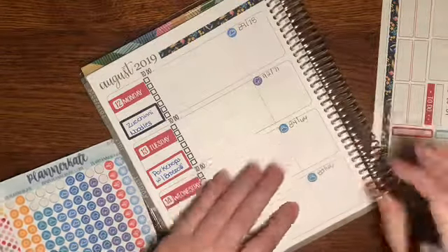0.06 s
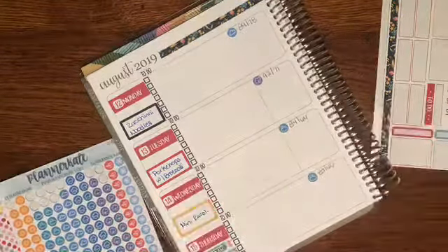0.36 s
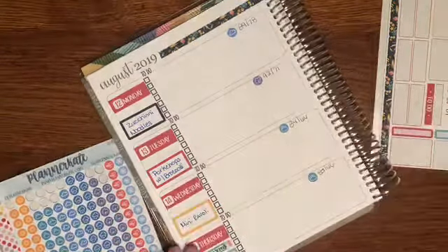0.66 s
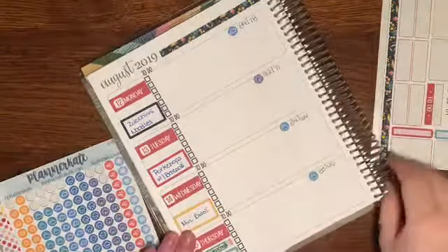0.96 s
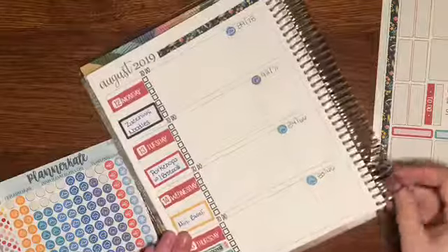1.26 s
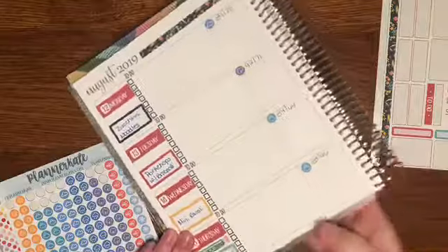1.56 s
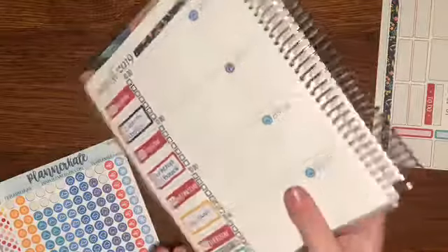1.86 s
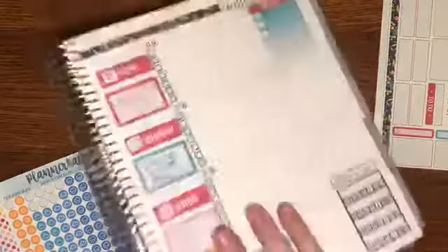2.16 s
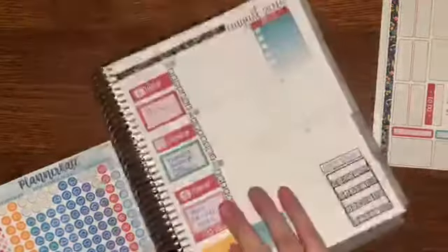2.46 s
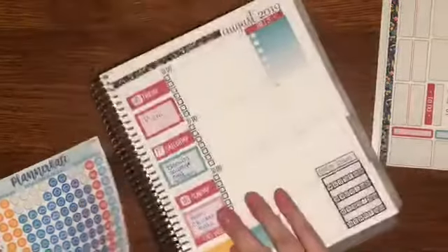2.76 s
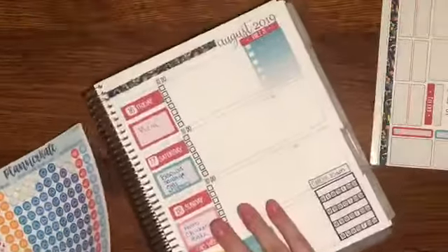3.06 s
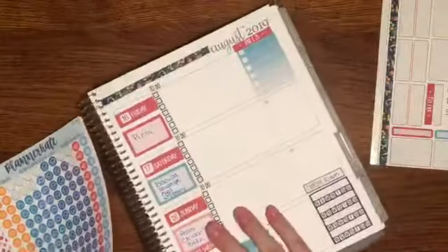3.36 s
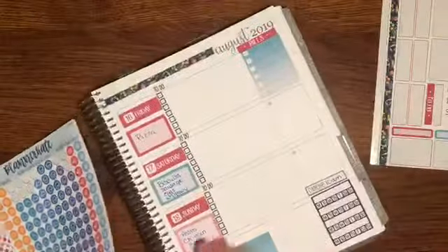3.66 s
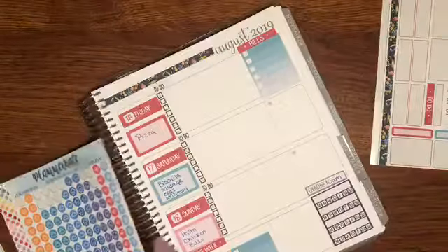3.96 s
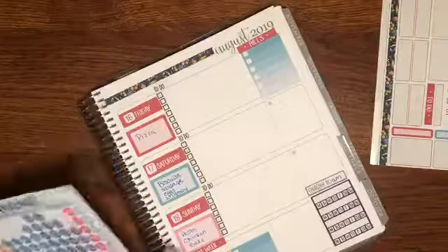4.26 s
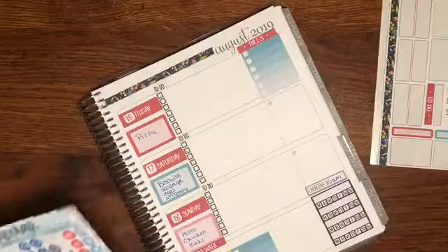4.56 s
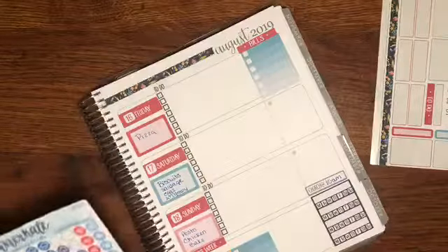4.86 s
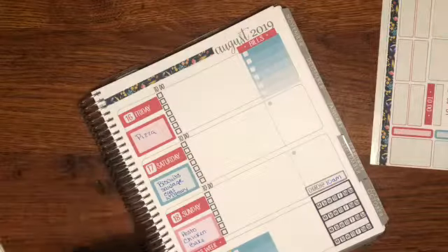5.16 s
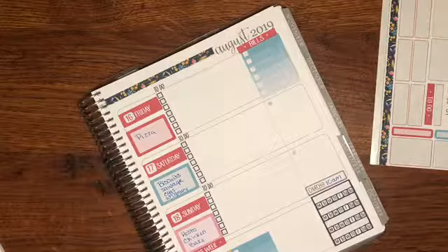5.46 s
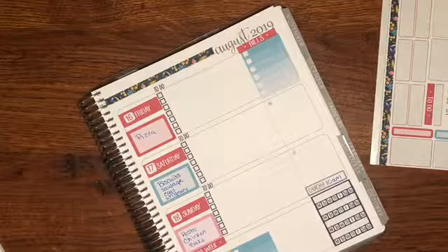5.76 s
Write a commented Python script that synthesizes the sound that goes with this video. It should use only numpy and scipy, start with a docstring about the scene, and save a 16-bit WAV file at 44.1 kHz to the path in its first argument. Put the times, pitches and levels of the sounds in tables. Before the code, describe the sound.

A pen clatters onto a wooden table, then a spiral-bound planner is flipped over with a slap, amid soft paper rustles.

```python
"""A spiral-bound planner on a wooden table, close to the microphone in a small quiet room.
At 0.4 s a pen is put down: it clatters, knocks the wood and its barrel rings. From 1.4 s the planner
is lifted and turned over; at 2.3 s it drops with a slap and a boom of the table, then slides into
place, paper fibres catching and slipping. From 3.3 s a sticker sheet is dragged aside, snaps at its
edge and is laid down at 5.4 s."""
import sys
import numpy as np
from scipy import signal
from scipy.fft import rfft, irfft
from scipy.io import wavfile
from scipy.ndimage import uniform_filter1d

SR = 44100
rng = np.random.default_rng(int(sys.argv[2]) if len(sys.argv) > 2 else 0)


def wav_record(signal):
    """Record a signal, one row per channel, as 16-bit PCM in the file named by sys.argv[1]."""
    frames = np.transpose(np.atleast_2d(signal))
    bounded = np.clip(frames, -1, 1)
    # unit amplitude maps onto the largest positive 16-bit level
    quanta = np.round(bounded * 32767).astype(np.int16)
    wavfile.write(sys.argv[1], SR, quanta)


N = 255339

# Knock resonances of the table top. Each row: frequency in Hz, width in Hz, relative level in dB.
WOOD_RESONANCES = [(273, 52, -1), (416, 34, -1.5), (668, 40, -4.5), (1094, 65, -13)]


def amp(db):
    """Decibels to gain."""
    return 10 ** (np.asarray(db) / 20)


def unit_rms(x):
    """Scales to rms 1."""
    return x / np.sqrt(np.mean(x ** 2) + 1e-20)


def unit_blow(x):
    """Scales to the energy of 10 ms at rms 1."""
    return x / np.sqrt(np.sum(x ** 2) / (SR / 100) + 1e-20)


def curve(points, hz):
    """Interpolates (Hz, value) points on a log-frequency axis."""
    point_hz, values = np.transpose(points)
    return np.interp(np.log(hz + 1), np.log(point_hz), values)


def add(mix, start_s, sound):
    """Mixes a sound in at start_s."""
    part = mix[max(round(start_s * SR), 0):][:len(sound)]
    part += sound[:len(part)]


def fade(t, t60_s):
    """Exponential decay, 60 dB in t60_s."""
    return 1000 ** (-t / max(t60_s, 1e-3))


def ring(modes, t):
    """Sum of decaying sine modes."""
    return sum(amp(db) * fade(t, t60_s) * np.sin(2 * np.pi * hz * t) for hz, db, t60_s in modes)


def coloured(x, db_at, size=4096):
    """Minimum-phase filter with gain db_at(Hz)."""
    log_gain = np.log(amp(db_at(abs(np.fft.fftfreq(size, 1 / SR)))))
    response = np.fft.ifft(np.exp(np.conj(signal.hilbert(log_gain)))).real
    return signal.oaconvolve(x, response[:size // 2])[:len(x)]


def whitened(x, size=4096):
    """Flattens the broad humps of a burst's spectrum."""
    power = uniform_filter1d(abs(np.fft.fft(x, size)) ** 2, size=45, mode="wrap")
    return coloured(x, lambda hz: -10 * np.log10(power / power.mean() + 1e-6), size=size)


def peaks_db(resonances, hz):
    """Boost that resonances add to a spectrum."""
    return sum(db / (1 + (2 * (hz - centre_hz) / width_hz) ** 2) for centre_hz, width_hz, db in resonances)


def tone_db(colour, hz, body_db, fizz_db):
    """Contact spectrum: broad contact adds body (mids), dry sharp contact adds fizz (treble)."""
    body_weight = curve([(300, 0.21), (900, 0.91), (2300, 0.63), (3300, 0.097)], hz)
    fizz_weight = curve([(4800, 0), (8000, 0.41), (12500, 0.92)], hz)
    return curve(colour, hz) + body_db * body_weight + fizz_db * fizz_weight


def background(rms_db=-65):
    """Steady low room rumble with a faint hiss."""
    # Each row: frequency in Hz, relative noise density in dB.
    spectrum = [(22, -45.5), (40, -23.5), (53, -13), (64, 2.5), (76, -7), (95, -14.5), (135, -4.5),
                (200, -13.5), (350, -15), (600, -17.5), (1100, -21.5), (2300, -32.5), (3400, -34.5),
                (4250, -27.5), (4900, -36.5), (6500, -36), (16000, -44)]
    gain = amp(curve(spectrum, np.fft.rfftfreq(N, 1 / SR)))
    return amp(rms_db) * unit_rms(irfft(rfft(rng.standard_normal(N)) * gain, N))


def room(x, early_db=-9, early_t60_s=0.062, tail_db=-18, echoes_per_s=3000):
    """Adds quick reflections off the table and nearby things, then a short, duller tail."""
    # Each row: frequency in Hz, reverberation t60 in seconds.
    decay_times = [(100, 0.53), (400, 0.33), (1500, 0.31), (4000, 0.36), (6000, 0.21), (15000, 0.29)]
    # Soft furnishings absorb treble. Each row: frequency in Hz, gain in dB.
    tail_colour = [(150, 1), (1200, 2), (2500, -0.5), (4000, -3), (5200, -2), (7000, 2), (14000, -6.5)]
    t = np.arange(SR * 2 // 3) / SR
    taps = rng.choice([-1., 1.], (2, len(t))) * (rng.random((2, len(t))) < echoes_per_s / SR)
    early = taps[0] * (t > 0.004) * fade(t, early_t60_s)
    hz, frame_s, spectra = signal.stft(taps[1] * (t > 0.009), SR, nperseg=256)
    decay = 1000 ** (-frame_s / curve(decay_times, hz)[:, None])
    tail = signal.istft(spectra * decay, SR, nperseg=256)[1][:len(t)]
    tail = coloured(tail / np.linalg.norm(tail), lambda f: curve(tail_colour, f))
    response = amp(early_db) * early / np.linalg.norm(early) + amp(tail_db) * tail
    return x + signal.fftconvolve(x, response)[:N]


def wood(force):
    """Passes a force through the resonances of the table top."""
    return sum(amp(db) * signal.lfilter(*signal.iirpeak(hz, hz / width_hz, SR), force)
               for hz, width_hz, db in WOOD_RESONANCES)


def knock(db, t60_s):
    """Struck table top: its modes, detuned per hit, plus a short rattle through the wood."""
    t = np.arange(SR // 4) / SR
    modes = sum(amp(mode_db) * np.exp(-np.pi * width_hz * t)
                * np.sin(2 * np.pi * hz * rng.uniform(0.88, 1.04) * t)
                for hz, width_hz, mode_db in WOOD_RESONANCES)
    attack = 1 - np.exp(-t / 0.001)
    rattle = wood(rng.standard_normal(len(t)) * fade(t, t60_s))
    return amp(db) * unit_blow(unit_blow(modes * attack) + 0.74 * unit_blow(rattle))


def contact(colour, t60_s, body_db, fizz_db, spot_hz, rise_s, q, peak_db):
    """A brief burst of micro-collisions, filtered by the spot struck."""
    t = np.arange(SR // 4) / SR
    chatter = rng.choice([-1., 1.], len(t)) * fade(t, t60_s) * (1 - np.exp(-t / rise_s))
    spot = [(hz, hz / q, peak_db) for hz in spot_hz]
    burst = coloured(whitened(chatter),
                     lambda hz: tone_db(colour, hz, body_db, fizz_db) + peaks_db(spot, hz))
    return unit_blow(burst)


def clack(spot_hz, t60_s):
    """Short pitched notes of a hard edge, the higher ones stronger."""
    t = np.arange(SR // 10) / SR
    notes = sum(np.sqrt(hz) * np.sin(2 * np.pi * hz * t) for hz in spot_hz)
    return unit_blow(notes * fade(t, t60_s) * (1 - np.exp(-t / 0.0033)))


def rub_gain(hz, body_db, fizz_db, swish_hz, swish_q=3.5, swish_db=4):
    """Spectrum of one rub, rms 1: fixed page resonances under a broad swish."""
    # Each row: frequency in Hz, relative level in dB.
    colour = [(150, -2.5), (400, -11.5), (700, -17), (1150, -13), (1700, -14), (2300, -7.5), (3200, -5),
              (4100, 2.5), (5000, -5.5), (6300, -17), (8500, -31.5), (14200, -39.5)]
    # Page stack and cover. Each row: frequency in Hz, width in Hz, boost in dB.
    page_resonances = [(1109, 49, 9), (1753, 310, 6.5), (2920, 97, 0), (3575, 220, 2), (3860, 140, -2)]
    resonances = list(page_resonances) + [(swish_hz, swish_hz / swish_q, swish_db)]
    return unit_rms(amp(tone_db(colour, hz, body_db, fizz_db) + peaks_db(resonances, hz)))


def hand_speed(t, start_s, rise_s, hold_s, release_s):
    """Speed of a stroke, 0 to 1: ramps up, holds, ramps down."""
    rising = (t - start_s) / max(rise_s, 1e-3)
    falling = (start_s + rise_s + hold_s + release_s - t) / max(release_s, 1e-3)
    return np.clip(np.minimum(rising, falling), 0, 1) ** 0.94


def paper_slides(snaps_per_s=1200, snap_share=0.24, idle_db=-74, patchy_db=1.5, flicker_db=1.6):
    """Paper fibres catch and slip: hiss and tiny snaps follow the hand's speed; the wood rumbles."""
    # Paper under the hands or on the wood. Each row: start, rise, hold and release in seconds,
    # level, body and fizz in dB, swish pitch in Hz.
    strokes = [(0.0, 0.0033, 0.037, 0.14, -52, 7, 14, 4200), (0.16, 0.025, 0.091, 0.2, -65, -7, 18, 4140),
               (0.91, 0.057, 0.017, .11, -59.5, 18, 6, 4010),
               (1.36, 0.21, 0.034, 0.15, -54, 4.5, 22.5, 3900),
               (1.436, 0.037, 0.013, 0.013, -47, -3, 2, 3950), (1.62, 0.083, .56, .1, -63.5, 11.5, 7, 4130),
               (1.829, 0.071, 0.055, 0.12, -47.5, -8.5, 3, 5620),
               (2.35, 0.18, 0.11, 0.081, -58, 12, 0, 4270), (2.63, 0.21, 0.01, 0.039, -45.5, 2, -8, 3740),
               (2.86, 0.1, 0.26, 0.22, -51, 9, -2, 3540), (3.31, 0.053, .11, .05, -53.5, 19.5, 17, 3800),
               (3.42, 0.053, 0.0055, 0.021, -46.5, 17, 2, 3800), (3.49, .03, 0.1, 0.049, -60, 14, 12, 4100),
               (3.578, 0.15, 0.0055, 0.058, -47.5, 4, -14, 3600),
               (3.73, 0.3, 0.027, 0.064, -49.5, -6.5, 4, 4150),
               (4.05, 0.018, 0.17, 0.088, -55, 9.5, 3, 4400), (4.39, 0.064, .14, 0.053, -69.5, -3, 8, 4180),
               (4.895, 0.047, 0.14, .05, -61, -1.5, 18.5, 4110),
               (5.03, 0.03, .005, 0.037, -63, -2.5, 28, 4050),
               (5.07, 0.045, .02, 0.17, -62.5, -5.5, 3, 4400), (5.25, 0.12, .05, 0.15, -63, 6, 13, 4150)]
    snaps = (rng.random(N) < snaps_per_s / SR) * rng.choice([-1, 1], N)
    snaps = snaps * amp(3 * np.minimum(rng.exponential(1, N), 4))
    friction = np.sqrt(snap_share) * unit_rms(snaps) + np.sqrt(1 - snap_share) * rng.standard_normal(N)
    hz, frame_s, spectra = signal.stft(friction, SR, nperseg=512, noverlap=384)
    idle_rustle = amp(idle_db) * rub_gain(hz, body_db=6.5, fizz_db=10.5, swish_hz=4136)
    hiss_power, drag_power = idle_rustle[:, None] ** 2, 0
    for *timing_s, db, body_db, fizz_db, swish_hz in strokes:
        level = amp(db) * hand_speed(frame_s, *timing_s)
        hiss_power = hiss_power + np.outer(rub_gain(hz, body_db, fizz_db, swish_hz), level) ** 2
        drag_power = drag_power + (level * amp(-16 + 0.15 * body_db)) ** 2
    # The colour shifts as different spots of the paper touch.
    patches = uniform_filter1d(rng.standard_normal(spectra.shape), size=5, axis=0)
    patches = unit_rms(uniform_filter1d(patches, size=16, axis=1))
    spectra = spectra * amp(patchy_db * patches) * np.sqrt(hiss_power)
    hiss = signal.istft(spectra, SR, nperseg=512, noverlap=384)[1][:N]
    hand_jitter = unit_rms(uniform_filter1d(rng.standard_normal(N), size=700))
    drag_level = np.interp(np.arange(N) / SR, frame_s, np.sqrt(drag_power))
    drag = unit_rms(wood(rng.standard_normal(N))) * drag_level
    return amp(flicker_db * hand_jitter) * (hiss + drag)


def page_bumps(width_hz=90, puff_db=-7, puff_band_hz=(180, 850)):
    """Fingers and palm push on the page stack: a dull puff around one hollow resonance."""
    # Each row: start in seconds, level in dB, t60 in seconds, stack pitch in Hz.
    bumps = [(.545, -49, 0.029, 702), (0.552, -41, .041, 285), (0.892, -53, .14, 340),
             (.917, -42, 0.21, 370), (.958, -40.5, 0.11, 388), (1.049, -44.5, .12, 297.6),
             (1.163, -49.5, 0.053, 412), (1.695, -52, 0.053, 416), (1.963, -55, .06, 419),
             (2.009, -57.5, 0.11, 424), (2.303, -33, 0.045, 347), (2.322, -26, 0.042, 480),
             (2.946, -48.5, 0.086, 308), (3.048, -53, 0.027, 373), (3.327, -49, 0.15, 280),
             (3.404, -51, 0.1, 362), (3.438, -48.5, .17, 300), (3.482, -39, 0.049, 272),
             (4.108, -49, 0.025, 650), (5.665, -59.5, .035, 450)]
    out, t = np.zeros(N), np.arange(SR // 4) / SR
    for start_s, db, t60_s, hz in bumps:
        force = rng.standard_normal(len(t)) * fade(t, t60_s) * (1 - np.exp(-t / 0.003))
        puff = signal.lfilter(*signal.butter(2, puff_band_hz, "band", fs=SR), force)
        hollow = signal.lfilter(*signal.iirpeak(hz, hz / width_hz, SR), puff)
        add(out, start_s, amp(db) * (unit_blow(hollow) + amp(puff_db) * unit_blow(puff)))
    return out


def finger_ticks():
    """Nails, fingers and page edges tick; a touch with more body rings lower and knocks harder."""
    # Each row: start in seconds, level in dB, t60 in seconds, body and fizz in dB.
    touches = [(0.111, -54, 0.036, -10, 0), (0.13, -46, 0.04, -3, 11), (0.296, -51, 0.021, -13, 2),
               (0.3251, -54, 0.02, -2.5, -13.5), (0.39, -56, .043, 9.5, -11.5),
               (0.9145, -33, 0.073, 8.5, 10), (0.964, -46, .05, 13.5, 6), (1.031, -47, .053, 12, -29),
               (1.0465, -50.5, .05, 8, -17), (1.1621, -52, 0.027, 15, -25), (1.4141, -48.5, 0.026, 15, 5),
               (1.461, -47, .08, -14, -10), (1.6858, -51, 0.011, 27, -9), (1.7777, -53.5, 0.0061, 9, 7),
               (2.005, -43, 0.039, -2, 1), (2.273, -47.5, .05, 9, -6), (2.281, -43, .038, 8, -10),
               (3.7594, -39, 0.0099, 0.5, 0), (3.8803, -48, 0.017, 3, -11), (3.899, -45.5, 0.021, 7.5, 1),
               (4.3728, -61.5, 0.02, 15, -8), (4.417, -59, 0.026, 11.5, -8), (4.576, -57, .017, 1.5, 1),
               (4.601, -62, .071, 19, -7), (5.3945, -48, 0.026, 17.5, 6.5), (5.471, -47, 0.019, 11.5, -2)]
    # Each row: frequency in Hz, relative level in dB.
    colour = [(150, -9), (400, -0.5), (700, -11), (1150, -7.5), (1700, -9.5), (2300, -6.5), (3200, -1.5),
              (4100, 6), (5000, -1.5), (6300, -13.5), (8500, -20.5), (14200, -31.5)]
    # Each row: body in dB, pitch in Hz.
    pitch_by_body = [(-6.5, 3800), (7.5, 3800), (17, 1200), (23, 967)]
    out = np.zeros(N)
    for start_s, db, t60_s, body_db, fizz_db in touches:
        hz = np.interp(body_db, *np.transpose(pitch_by_body))
        tick = contact(colour, t60_s, body_db, fizz_db, [hz], rise_s=0.0003, q=4, peak_db=7.5)
        add(out, start_s, amp(db) * tick)
        add(out, start_s + 0.0016, knock(db - 17.5 + 0.87 * body_db, t60_s=0.053))
    return out


def table_thumps():
    """Landing weight excites the whole table's low modes; a longer push reaches only the lowest."""
    # Each row: start in seconds, relative level in dB, contact time in seconds.
    landings = [(0.423, -38.5, 0.0013), (0.583, -38, 0.0018), (0.654, -40, 0.0023), (1.168, -56, 0.0035),
                (1.43, -53, 0.0035), (1.492, -58, 0.0017), (1.841, -44, 0.00096), (2.304, -32, .0028),
                (2.323, -28.5, .002), (3.486, -33.5, 0.0065), (4.122, -56, .001), (5.403, -32, .012),
                (5.475, -58.5, 0.0037)]
    # Each row: frequency in Hz, relative level in dB, t60 in seconds.
    modes = [(49.4, -11.5, 0.39), (62, -21, 0.17), (131, -14.5, 0.058), (147.7, 3, 0.24), (163, -8, 0.46),
             (200.7, 1, 0.13), (236.2, -6.5, .07)]
    out, t = np.zeros(N), np.arange(SR) / SR
    # Each mode takes about a cycle to spread over the table.
    boom = sum(ring([(hz, db, t60_s)], t) * (1 - np.exp(-1.3 * hz * t)) for hz, db, t60_s in modes)
    for start_s, db, contact_s in landings:
        push = np.hanning(int(contact_s * SR) + 3)
        add(out, start_s, amp(db + 5.5) * signal.oaconvolve(boom, push / push.sum()))
    return out


def edge_slaps():
    """Coil, cover and sheet edge come down: a crack, a clack and a knock of the wood."""
    # Each row: start in seconds, relative level in dB, t60 in seconds, body, fizz and relative knock
    # level in dB, three resonances of the spot struck in Hz.
    slaps = [(1.4864, -35, 0.027, -20, -1, -41, 1360, 3330, 3980),
             (2.297, -35, 0.045, 7, -4.5, -35, 1020, 2540, 4400),
             (2.3204, -14.5, 0.0088, -1.5, -4.5, -25, 950, 2526, 4850),
             (2.3221, -19.5, 0.0085, 2, 1, -40, 806, 2060, 2473),
             (3.477, -26, 0.02, -6.5, -13, -46, 864, 2645, 4040),
             (3.481, -31, 0.0067, 3.5, -6, -44.5, 876, 1970, 3450),
             (4.1222, -27, 0.018, -5, -46, -44.5, 1190, 1280, 2910)]
    # Each row: frequency in Hz, relative level in dB.
    colour = [(150, -19.5), (400, -16.5), (700, -8.5), (1150, -13.5), (1700, -6.5), (2300, -7.5),
              (3200, -6.5), (4100, -2.5), (5000, -4.5), (6300, -16.5), (8500, -26.5), (14200, -31)]
    out = np.zeros(N)
    for start_s, db, t60_s, body_db, fizz_db, knock_db, *spot_hz in slaps:
        crack = contact(colour, t60_s, body_db, fizz_db, spot_hz, rise_s=0.00033, q=9, peak_db=8.5)
        add(out, start_s, amp(db - 0.5) * crack)
        add(out, start_s + 0.00029, amp(db - 7.5) * clack(spot_hz, t60_s=0.0073))
        add(out, start_s + 0.0022, knock(knock_db - 7, t60_s=0.045))
    return out


def pen_clatter(detune_hz=15, spread_db=2):
    """Each hit of the pen cracks, knocks the wood and leaves barrel and clip ringing."""
    # Each row: start in seconds, level in dB, t60 in seconds, body, fizz and knock level in dB,
    # three resonances of the spot struck in Hz.
    hits = [(0.4142, -13.5, 0.025, -2.5, -1.5, -24.5, 1110, 2470, 4320),
            (0.4606, -25.5, .032, 5.5, -3.5, -35, 1093, 2040, 3830),
            (0.5799, -13.5, 0.014, -4, -1.5, -23.5, 1650, 3200, 4340),
            (0.6408, -30.5, 0.066, -3, 8, -30.5, 814, 2600, 3940),
            (0.6475, -14.5, 0.027, -5, 3, -31.5, 764, 2544, 3950),
            (0.651, -18.5, 0.0063, -7, -4.5, -41, 740, 3350, 3630),
            (0.6769, -23, 0.023, 7.5, -4, -32.5, 750, 1950, 4230)]
    # Each row: frequency in Hz, relative level in dB.
    colour = [(150, -26.5), (400, -16), (700, -15.5), (1150, -10.5), (1700, -9.5), (2400, -7), (3200, -3.5),
              (3950, 1), (5000, -4), (6300, -15.5), (8500, -22), (14200, -25)]
    # Each row: frequency in Hz, level relative to the hit in dB, t60 in seconds.
    barrel_modes = [(3214, -35, .25), (3425, -35, 0.34), (3552, -33, .32), (3740, -34.5, .32),
                    (3780, -30.5, .37), (3885, -31, .38), (4050, -32.5, 0.51), (4340, -34, .3),
                    (4660, -38.5, .22), (5010, -39.5, 0.23)]
    out, t = np.zeros(N), np.arange(SR // 2) / SR
    for start_s, db, t60_s, body_db, fizz_db, knock_db, *spot_hz in hits:
        crack = contact(colour, t60_s, body_db, fizz_db, spot_hz, rise_s=0.00057, q=5.8, peak_db=4.5)
        add(out, start_s, amp(db) * crack)
        add(out, start_s + 0.0003, amp(db - 7) * clack(spot_hz, t60_s=0.014))
        add(out, start_s + 0.0023, knock(knock_db, t60_s=0.08))
        # Each hit favours other modes, slightly detuned by the contact.
        modes = [(hz + detune_hz * rng.standard_normal(),
                  mode_db + spread_db * rng.standard_normal(), ring_s)
                 for hz, mode_db, ring_s in barrel_modes]
        add(out, start_s + 0.0013 * rng.random(), amp(db) * ring(modes, t))
    return out


def scene():
    """Contacts and rubs with room reflections, plus the table's dry boom; mono."""
    handling = pen_clatter() + edge_slaps() + finger_ticks() + page_bumps() + paper_slides()
    return (room(handling) + table_thumps())[None]


def record(dry, cutoff_hz=16300):
    """Microphone colour, steady background, soft peak limiting, low-pass."""
    # Bass roll-off; notch and resonance in the top octave. Each row: frequency in Hz, gain in dB.
    microphone = [(20, -25), (32, -10), (48, -3.5), (9000, 0), (11200, -18.5), (12600, 2), (14200, 15),
                  (15400, 4), (16400, -6.5)]
    heard = coloured(dry[0], lambda hz: curve(microphone, hz)) + background()
    limited = heard / (1 + heard ** 6) ** (1 / 6)
    lowpass = signal.firwin(255, cutoff_hz, window=("kaiser", 9), fs=SR)
    return signal.oaconvolve(limited, lowpass, "same")[None]


dry = scene()
out = record(dry)
wav_record(out)
```